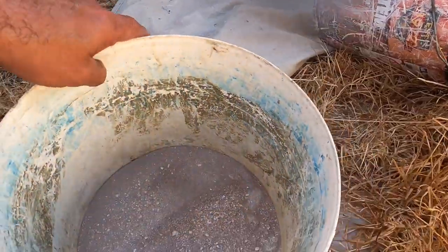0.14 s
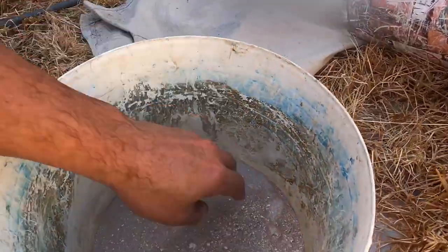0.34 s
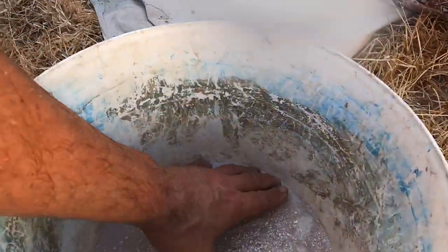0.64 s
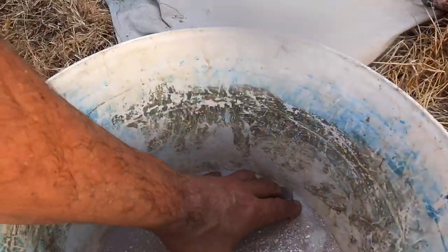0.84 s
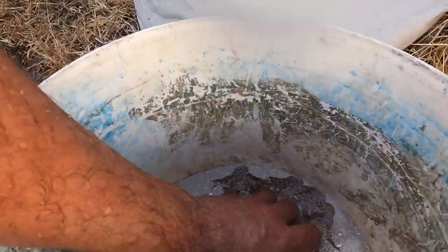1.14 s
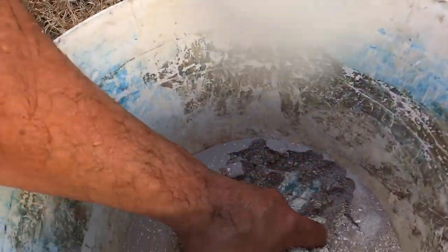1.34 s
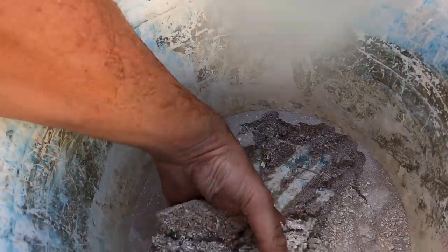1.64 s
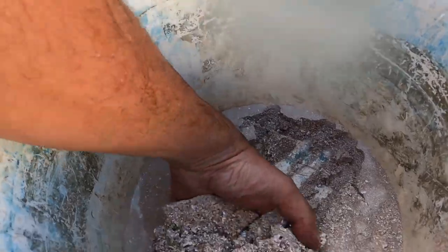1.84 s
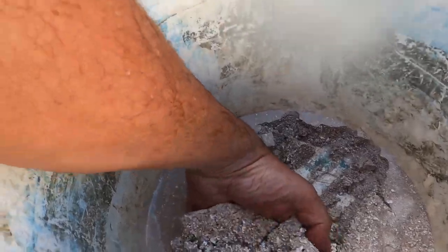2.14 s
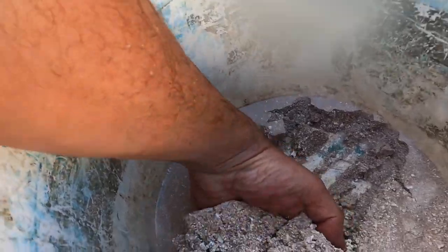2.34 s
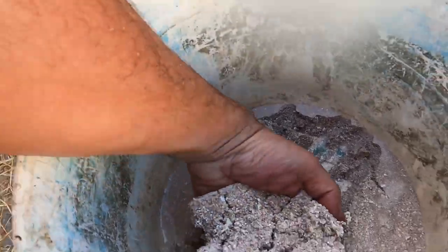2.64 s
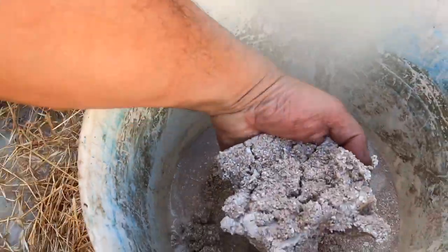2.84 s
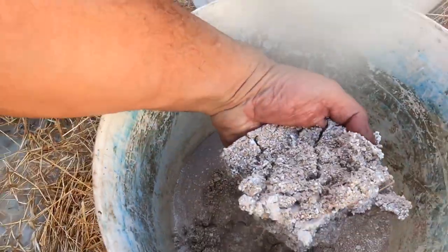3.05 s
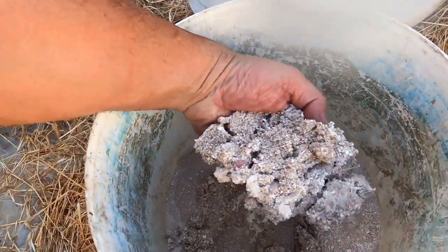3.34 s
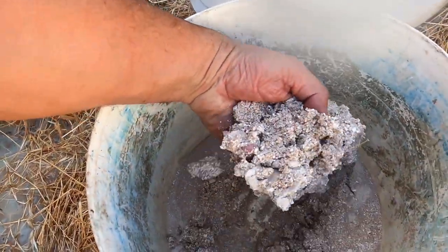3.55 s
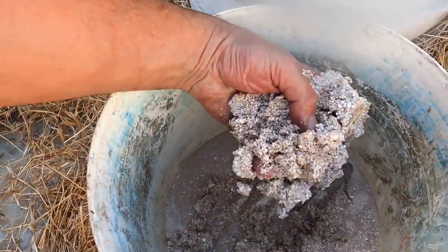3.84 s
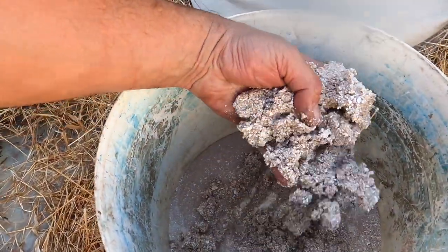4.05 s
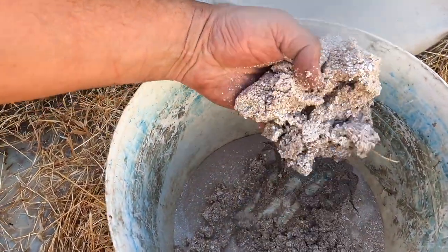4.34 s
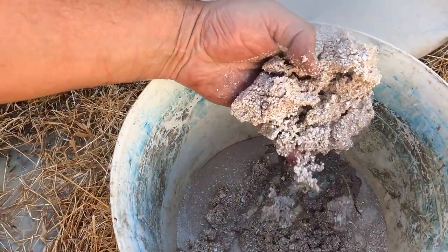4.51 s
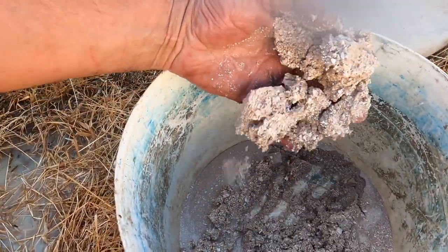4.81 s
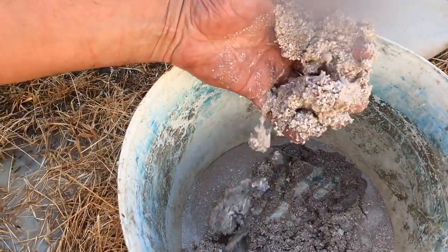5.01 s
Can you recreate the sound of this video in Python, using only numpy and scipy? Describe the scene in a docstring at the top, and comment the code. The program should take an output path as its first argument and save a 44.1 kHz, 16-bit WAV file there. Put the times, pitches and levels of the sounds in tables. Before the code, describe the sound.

Wet gritty scraping and knocking in a plastic bucket, then quiet handling of a crumbling crust with sharp snaps, above a slowing far-off motor hum.

```python
"""A hand digs in the wet sand of a plastic bucket: pressed grit scrapes and drives the bucket's modes.
Lumps knock on the bottom, the palm splats, the released rim rings and short low thuds sink in pitch.
A crumbling crust of scale is prised loose: it rubs, squeals, spills sand and snaps in brittle crumbs.
The impacts are clicks with dying sprays of grit, filtered; faint irregular pops fill three broad bands.
Outdoors, a far engine drones and slows down as a sum of gliding sines over noise of the open air."""
import sys
import numpy as np
from scipy import signal
from scipy.fft import rfft, irfft, next_fast_len
from scipy.io import wavfile

SR = 44100
rng = np.random.default_rng(int(sys.argv[2]) if len(sys.argv) > 2 else 0)


def dump(signal):
    """Clip the signal to [-1, 1] and save it as 16-bit WAV at the path in sys.argv[1]."""
    limited = np.clip(np.atleast_2d(signal).T, -1, 1)
    pcm = np.round(limited * 32767).astype(np.int16)
    wavfile.write(sys.argv[1], SR, pcm)


N = 228199
TIME = np.arange(N) / SR


def digging():
    """Friction: pressed grit excites the bucket's modes; coarse and fine grains also radiate directly."""
    # crushed coarse grit: (frequency [Hz], relative spectral density [dB])
    grit_spectrum = [(400, -13), (1200, -6), (2400, 3.5), (3100, -1), (3600, 4.5), (4600, 2.5),
                     (5600, -1.5), (7500, -6), (10000, -68)]
    # sliding fine sand: (frequency [Hz], relative spectral density [dB])
    sand_spectrum = [(2000, -10), (4000, -4), (5200, 0), (6900, 5), (7600, 2.5), (8400, -13), (10000, -22),
                     (11300, -39), (12500, -33), (14000, -53.5), (16000, -73)]
    pressure, crushed, sliding = efforts()
    channels = []
    for _ in range(2):  # the middle and the sides hear different grains
        bottom_force = grains(1500, spread_db=2.5, clump_db=2.5, clump_rate=160)
        coarse = grains(3500, spread_db=2.0, clump_db=2.5, clump_rate=190)
        fine = grains(12000, spread_db=3.0, clump_db=1.5, clump_rate=67)
        scrape = pressure * rms_one(bucket(bottom_force))
        grit = crushed * rms_one(colour(coarse, grit_spectrum))
        sand = sliding * rms_one(colour(fine, sand_spectrum))
        channels.append(scrape + grit + sand)
    return channels


def efforts():
    """Power addition: steady contact and pushes give amplitudes of pressure, crushing and sliding."""
    # how hard the hand bears on the sand between pushes: (time [s], level [dB])
    contact = [(0, -46.5), (.3, -48), (.62, -50.5), (.78, -43), (.85, -36.5), (.99, -36), (1.015, -45),
               (1.035, -40.5), (1.06, -35), (1.095, -45), (1.15, -37.5), (1.225, -34), (1.27, -36),
               (1.4, -38.5), (1.86, -42), (1.98, -50), (2.9, -45.5), (3.2, -51.5), (3.75, -50.5),
               (5.17, -46.5)]
    # what contact brings: (pressure on the bottom [dB], crushed grit [dB], sliding fine sand [dB])
    contact_shares = (-2.86, 0, 0.49)
    # pushes of the fingers:
    # (time of the height [s], rise [s], fall [s], pressure [dB], crushed grit [dB], sliding sand [dB])
    strokes = [(.675, 0.036, 0.035, -42.5, -41, -61), (0.984, 0.053, 0.017, -31, -27, -29),
               (1.07, 0.016, 0.03, -33, -35, -37), (1.122, .012, 0.012, -41, -47, -33),
               (1.185, 0.052, 0.023, -29, -49, -48), (1.343, 0.059, 0.044, -42, -27, -26),
               (1.48, 0.023, 0.076, -46, -34, -30), (1.53, 0.046, 0.068, -32.5, -34.5, -35),
               (1.73, 0.13, 0.01, -40.5, -49, -39), (2.49, 0.14, 0.064, -37.5, -44, -32.5),
               (2.71, 0.095, 0.04, -47, -53, -42)]
    seep_db = -48.5  # fine sand that never quite settles
    contact_db, = in_time(contact)
    power = np.outer(from_db(contact_shares), from_db(contact_db)) ** 2
    for s, rise_s, fall_s, *levels_db in strokes:
        power += np.outer(from_db(levels_db), swell(s, rise_s, fall_s)) ** 2
    power[2] += from_db(seep_db) ** 2
    return np.sqrt(power)


def bucket(force):
    """Modal superposition: a force on the bottom excites parallel modes of alternating sign."""
    # modes of the loaded bucket: (frequency [Hz], bandwidth [Hz], relative level [dB])
    modes = [(316.5, 18.6, 3), (683, 80, -4), (798, 75, 0), (946, 180, -2), (1172, 160, 0),
             (1358, 104, -1.5), (1467, 78, -1), (1695, 32, 1), (1860, 28, -2), (2560, 360, -21),
             (2950, 34, -3)]
    answer = 0
    for k, (hz, width_hz, db) in enumerate(modes):
        answer = answer + (-1) ** k * from_db(db) * resonance(force, hz, width_hz)
    return soften(answer)


def packing(packing_db=-9):
    """Granular compaction: damp sand gives way under the fingers in many small dull fractures."""
    # dull crunch of packing sand: (frequency [Hz], relative spectral density [dB])
    packing_spectrum = [(120, -26.5), (250, -2.5), (350, 2.5), (450, -9.5), (620, -6.5), (900, -15),
                        (2000, -39), (16000, -80)]
    pressure = efforts()[0]
    fractures = grains(900, spread_db=3.5, clump_db=3.5, clump_rate=50)
    return from_db(packing_db) * pressure * rms_one(colour(fractures, packing_spectrum))


def slap():
    """Impact on a lossy surface: the palm lands flat on the wet sand in a quick run of splats."""
    # landings of the palm: (time [s], peak level [dB])
    slaps = [(.5465, -18), (.5515, -8.5), (.557, -19)]
    # splat of a landing: (frequency [Hz], relative spectral density [dB])
    splat_spectrum = [(400, -35), (800, -7), (1300, 5), (1900, 6), (2400, -7), (3300, -6), (4500, -15),
                      (7000, -30), (9000, -53), (16000, -75)]
    return blows(slaps, lambda x: colour(x, splat_spectrum), crumble=0.17, crumble_s=0.0051)


def squeal(width_hz=550, wander_hz=240):
    """Stick-slip: a hard edge's fast uneven slips modulate a screech that drops in pitch and settles."""
    # squeals over grit: (time of the height [s], rise [s], fall [s], level [dB], settled pitch [Hz])
    squeals = [(1.353, 0.049, 0.032, -23, 3440), (1.482, 0.029, 0.034, -30, 5500)]
    sharp_share, settle_s = .05, .017  # excess pitch at the height; it decays as the stroke slows
    out = 0
    for s, rise_s, fall_s, db, settled_hz in squeals:
        sharp = np.minimum(sharp_share * np.exp(np.minimum((s - TIME) / settle_s, 10)), .5)
        roughness = drift(2 * width_hz)
        hz = settled_hz * (1 + sharp) + wander_hz * drift(150)
        out = out + from_db(db) * swell(s, rise_s, fall_s) * roughness * tone(hz)
    return out


def rub():
    """Amplitude modulation: slips of damp grains along the wall form a noise band with gliding centre."""
    # rubs of the crust as it is prised loose: (time of the height [s], rise [s], fall [s],
    # level [dB], centre at the height [Hz], glide [octaves/s])
    rubs = [(2.47, 0.13, 0.076, -39.5, 1243, -1), (2.508, 0.012, 0.038, -36, 1384, 2),
            (2.685, 0.1, 0.021, -44, 1320, 3), (2.765, 0.02, 0.023, -38.5, 1254, -2.5)]
    band_hz = 390
    out = 0
    for s, rise_s, fall_s, db, hz, glide in rubs:
        slips = grains(2400, spread_db=2.5, clump_db=-0.5, clump_rate=79)
        slips = rms_one(soften(slips, band_hz / 2 * np.sqrt(2)))
        octaves = np.clip(glide * (TIME - s), -1, 1)
        out = out + from_db(db) * swell(s, rise_s, fall_s) * slips * tone(hz * 2 ** octaves)
    return out


def knocks(clack_db=-2.5, ring_db=-8, crack_db=4):
    """Impact excitation: a lump clacks on the damped bottom, rings it faintly and cracks at its surface."""
    # lumps and fingers on the plastic, before the layer gains:
    # (time [s], peak level of the knock [dB], peak level of its gritty crack [dB])
    knock_rows = [(.002, -16.5, -42), (.035, -25, -37), (.089, -18, -20.5), (0.101, -14.5, -22),
                  (0.124, -21, -39), (.268, -25, -26), (0.541, -15.5, -18), (0.545, -12.5, -16),
                  (0.549, -28, -22), (.551, -17.5, -27), (.66, -24.5, -44), (.991, -10.5, -30),
                  (0.998, -13, -38), (1.011, -12.5, -34), (1.0402, -9.5, -21.5), (1.049, -17, -16),
                  (1.068, -17, -35), (1.08, -12, -33), (1.1027, -9.5, -23), (1.111, -14, -12.5),
                  (1.116, -14, -18), (1.1227, -13.5, -11.5), (1.136, -17, -19), (1.1644, -15.5, -12.5),
                  (1.172, -16.5, -14), (1.1803, -17, -10.5), (1.185, -17, -12.5), (1.1905, -23, -11),
                  (1.2134, -16, -21.5), (2.496, -32, -26), (2.511, -22, -38), (2.642, -24.5, -32),
                  (2.687, -26.5, -32), (2.728, -32, -25.5), (2.737, -23.5, -42), (3.477, -26.5, -48),
                  (4.927, -26, -46)]
    # dead clack on the sand-damped bottom: (frequency [Hz], relative spectral density [dB])
    clack_spectrum = [(300, -15), (650, -22.5), (950, 2.5), (1250, 2.5), (1750, -4), (2400, -6.5),
                      (4000, -23.5), (8000, -31), (16000, -66)]
    # gritty crack: (frequency [Hz], relative spectral density [dB])
    crack_spectrum = [(500, -13), (1800, 0.5), (3500, 9.5), (5700, 4), (7400, 3.5), (8500, -18),
                      (11000, -33), (16000, -47)]
    s, peak_db, grit_db = np.transpose(knock_rows)
    clack = blows(np.c_[s, peak_db + clack_db], lambda x: colour(x, clack_spectrum),
                  crumble=0.16, crumble_s=0.0028)
    ringing = blows(np.c_[s, peak_db + ring_db], bucket, crumble=0.083, crumble_s=0.0077)
    crack = blows(np.c_[s, grit_db + crack_db], lambda x: colour(x, crack_spectrum),
                  crumble=0.17, crumble_s=0.002)
    return clack + ringing + crack


def thuds():
    """Damped free vibration: short thuds sink in pitch as they die; the free rim rings longer."""
    # short low sinking thuds: (time [s], initial level [dB], pitch [Hz])
    thud_rows = [(.205, -33, 283), (.553, -24, 822), (0.665, -28, 377), (0.684, -27.5, 337),
                 (1.076, -25.5, 346), (1.169, -23, 330), (1.195, -18, 328), (1.201, -21.5, 236),
                 (1.74, -32.5, 326), (1.885, -31.5, 341)]
    # the rim springs free of the hand: (time [s], initial level [dB])
    rim_taps = [(.001, -25.5), (0.099, -28.5)]
    # modes of the free rim: (frequency [Hz], relative level [dB], 60 dB decay time [s])
    rim_modes = [(314, 1, 0.18), (838, -3.5, 0.18)]
    t60_s, sag_per_s = .085, 3.1  # 60 dB decay time; share of its pitch a thud loses per second
    low = sum(ring(s, db, hz, t60_s, sag_per_s) for s, db, hz in thud_rows)
    rim = sum(ring(s, db + mode_db, hz, t60) for s, db in rim_taps for hz, mode_db, t60 in rim_modes)
    return low + rim


def crumbs():
    """Brittle fracture gives bright snaps of the crust; wet contacts give duller ticks."""
    # crumbs snapping: (time [s], peak level [dB])
    snap_rows = [(1.452, -16.5), (2.8814, -24.5), (3.757, -31.5), (3.8563, -16), (3.9037, -9), (3.9085, -8),
                 (3.9105, -26), (3.931, -22), (4.0362, -18.5), (4.0711, -23), (4.4848, -14),
                 (4.6577, -21.5), (4.804, -23.5), (5.0, -23), (5.1519, -15), (5.157, -17), (5.162, -19.5),
                 (5.168, -17.5)]
    # clearest wet ticks: (time [s], peak level [dB])
    tick_rows = [(.05, -29), (.208, -24.5), (.313, -21.5), (.373, -26.5), (.41, -24), (.43, -23),
                 (.468, -24.5), (.507, -27), (.618, -27), (2.975, -26), (3.2, -26), (3.284, -25.5),
                 (3.477, -30), (3.496, -25), (4.629, -26.5), (4.881, -31), (5.061, -28)]
    # snap of the crust: (frequency [Hz], relative spectral density [dB])
    snap_spectrum = [(800, -33), (2600, -11.5), (3900, -1.5), (5500, 3.5), (7200, 10), (8000, -2),
                     (9000, -26), (12000, -46), (16000, -70)]
    # wet tick: (frequency [Hz], relative spectral density [dB])
    tick_spectrum = [(400, -11), (750, -26), (1050, -5), (1400, -8), (1850, 3.5), (2400, 1.5), (3300, -10),
                     (5000, -4.5), (7000, -4), (9000, -48), (16000, -81)]
    snaps = blows(snap_rows, lambda x: colour(x, snap_spectrum), crumble=0.18, crumble_s=0.003)
    ticks = blows(tick_rows + faint_ticks(), lambda x: colour(x, tick_spectrum),
                  crumble=0.66, crumble_s=0.0027)
    return snaps + ticks


def faint_ticks(jitter=0.36, spread_db=2):
    """Jittered point process: unevenly spaced contacts as rows (time [s], peak level [dB])."""
    # loose runs of fainter ticks: (start [s], end [s], rate [1/s], mean peak level [dB])
    tick_runs = [(0.326, 0.453, 49, -29.5), (4.537, 5.1, 12, -34)]
    rows = []
    for start, end, per_s, db in tick_runs:
        for s in np.arange(start, end, 1 / per_s):
            late, louder = rng.standard_normal(2)
            rows.append((s + jitter * late / per_s, db + spread_db * louder))
    return rows


def spill():
    """Granular flow: loose grains fall off the crust as it is prised up and crumbles."""
    # spills: (time of the height [s], rise [s], fall [s], level [dB])
    spills = [(2.298, 0.18, 0.15, -46), (2.89, 0.041, 0.04, -44), (3.27, 0.058, 0.036, -39.5),
              (3.59, 0.03, 0.053, -39.5), (3.76, 0.12, .07, -49), (4.1, 0.28, 0.34, -36),
              (4.135, 0.0098, 0.017, -37), (4.29, 0.031, 0.03, -38), (5.1, 0.18, 0.15, -42)]
    # loose dry sand falling: (frequency [Hz], relative spectral density [dB])
    spill_spectrum = [(1500, -2.5), (4000, -7), (5200, -1.5), (6800, 5), (7600, 1), (8400, -10),
                      (10000, -19), (11300, -28.5), (12500, -27), (14000, -41), (16000, -43)]
    power = sum((from_db(db) * swell(s, rise_s, fall_s)) ** 2 for s, rise_s, fall_s, db in spills)
    falling = grains(9000, spread_db=2.0, clump_db=4.0, clump_rate=70)
    return np.sqrt(power) * rms_one(colour(falling, spill_spectrum))


def faint_pops():
    """Filtered shot noise: random impulses through three resonances give faint irregular pops."""
    # level of the pops: (time [s], level [dB])
    pop_curve = [(0, -46), (.4, -58), (.7, -50), (1.2, -43), (2.1, -52), (2.9, -48), (3.2, -47), (3.6, -51),
                 (4.1, -49), (4.7, -55), (5.17, -48)]
    # three broad bands near 1, 1.8 and 2.6 kHz: (frequency [Hz], bandwidth [Hz], relative level [dB])
    pop_bands = [(960, 150, -2), (1847, 400, -2), (2600, 600, -3.5)]
    db, = in_time(pop_curve)
    pops = 0
    for hz, width_hz, level_db in pop_bands:
        impulses = grains(650, spread_db=2.0, clump_db=5.5, clump_rate=88)
        pops = pops + from_db(level_db) * resonance(impulses, hz, width_hz)
    return from_db(db) * rms_one(soften(pops))


def walls(x, ring_s=0.01):
    """Early reflections: dense decaying echoes inside the bucket, of unit total energy."""
    age = TIME[:SR // 20]
    echoes = rng.standard_normal(len(age)) * np.exp(-age / ring_s) * (age > .0007)
    return signal.fftconvolve(x, echoes / np.linalg.norm(echoes))[:N]


def engine(waver_db=2.0, waver_rate=8, drone_db=-2):
    """Harmonic series through resonances: the five lowest exhaust orders carry; each wavers on its own."""
    # the far engine slows in two steps: (time [s], shaft frequency [Hz])
    engine_speed = [(0, 39.85), (.56, 38.9), (.8, 37.25), (1.3, 37.33), (1.9, 35.8), (2.3, 35.1),
                    (2.8, 34.4), (3.27, 35.93), (3.5, 29.42), (3.73, 27.4), (4.05, 29.22), (4.3, 28.82),
                    (4.55, 24.34), (4.75, 22.9), (5.17, 23.1)]
    # overall level of the hum: (time [s], relative level [dB])
    engine_load = [(0, -5.5), (.95, -3.5), (1.5, -2.5), (2.1, 0.5), (3.6, -5), (4.6, -1.5), (5.17, -1)]
    # strength of shaft orders 1 to 5: one relative level [dB] each
    orders_db = (8.5, 0.5, 0.5, -3.5, 4)
    # exhaust resonances that the orders slide through: (frequency [Hz], level [dB])
    exhaust = [(25, -50), (37, -45.5), (48, -34.5), (58, -31.5), (71, -36.5), (84, -30), (94, -36.5),
               (106, -35), (116, -33.5), (124, -37.5), (143, -43.5), (180, -48.5), (200, -55)]
    # booms around one pitch: (time of the height [s], rise [s], fall [s], added level [dB])
    booms = [(1.3, 0.1, 0.11, 5.5), (1.85, 0.12, 0.26, 7.5), (2.34, 0.13, 0.62, 16), (3.17, 0.21, 0.14, 12),
             (3.475, 0.072, 0.05, 23), (4.455, 0.047, 0.046, 13.5), (4.681, 0.18, 0.086, 12)]
    # second drone, before its gain: (time [s], frequency [Hz], level [dB])
    drone = [(0, 137.7, -35), (.7, 136.5, -40.5), (1, 132.9, -29), (1.6, 135.6, -43), (3.1, 133.9, -34.5),
             (3.4, 129, -40), (3.65, 128, -31.5), (4.1, 123, -67)]
    boom_hz, boom_width_hz = 73.2, 15
    shaft_hz, = in_time(engine_speed)
    load_db, = in_time(engine_load)
    boom_db = sum(db * swell(s, rise_s, fall_s) for s, rise_s, fall_s, db in booms)
    hum = 0
    for order, order_db in enumerate(orders_db, 1):
        hz = order * shaft_hz
        boom_share = np.exp(-((hz - boom_hz) / boom_width_hz) ** 2)
        db = order_db + at_hz(exhaust, hz) + load_db + boom_db * boom_share
        hum = hum + from_db(db + waver_db * drift(waver_rate)) * tone(hz)
    hz, db = in_time(drone)
    return hum + from_db(db + drone_db) * tone(hz)


def open_air(air_db=-35):
    """Stationary noise: two independent channels of coloured noise form the outdoor background."""
    # open air: (frequency [Hz], relative spectral density [dB])
    air_spectrum = [(15, -2), (30, -3), (60, 1), (110, -3), (170, -6), (260, -17), (400, -25.5),
                    (600, -28.5), (1000, -28), (1500, -37), (2500, -35.5), (4000, -49), (7500, -40),
                    (10000, -51), (16000, -70)]
    return from_db(air_db) * rms_one(colour(rng.standard_normal((2, N)), air_spectrum))


def grains(per_s, spread_db, clump_db, clump_rate):
    """Shot noise: random impulses of uneven size and either sign, bunched by a random drift."""
    born = rng.random(N) < per_s / SR
    sizes_db = spread_db * np.minimum(rng.exponential(1, N), 4)
    signs = rng.choice([-1, 1], N)
    return born * from_db(sizes_db) * signs * from_db(clump_db * drift(clump_rate))


def blows(rows, body, crumble, crumble_s):
    """Impulse response: a click and dying spray of grit pass through a body at each row's peak level."""
    age = TIME[:SR // 20]
    sprays = rng.standard_normal((len(rows), len(age))) * np.exp(-age / crumble_s) * crumble
    sprays[:, 0] = 1  # the click
    answer = body(signal.unit_impulse(N))[:SR // 10]
    out = np.zeros(N + SR)
    for (s, db), spray in zip(rows, sprays):
        hit = signal.fftconvolve(spray, answer)
        start = max(round(s * SR), 0)
        out[start:start + len(hit)] += from_db(db) * hit / np.abs(hit).max()
    return out[:N]


def ring(s, db, hz, t60, sag_per_s=0):
    """Exponential decay: one struck mode dies away, its pitch perhaps sinking."""
    age = np.clip(TIME - s, 0, 3 * t60)
    cycles = hz * age * (1 - sag_per_s * age / 2)
    return from_db(db - 60 * age / t60) * np.sin(2 * np.pi * cycles)


def tone(hz):
    """Phase accumulation: a gliding sine of unit power."""
    return np.sqrt(2) * np.sin(2 * np.pi * (np.cumsum(hz) / SR + rng.random()))


def resonance(x, hz, width_hz):
    """Damped oscillator: a two-pole resonance with gain of about 1 on top."""
    r = np.exp(-np.pi * width_hz / SR)
    zeros = np.array([1, 0, -1]) * (1 - r * r) / 2
    poles = [1, -2 * r * np.cos(2 * np.pi * hz / SR), r * r]
    return signal.lfilter(zeros, poles, x + 1e-18)


def soften(x, top_hz=6000):
    """Low-pass filtering: rounds off the sharp edges of contacts."""
    return signal.sosfilt(signal.butter(4, top_hz, fs=SR, output="sos"), x)


def colour(x, spectrum):
    """Minimum phase: a causal filter follows a spectrum by folding its cepstrum."""
    size = next_fast_len(N + SR // 2, real=True) // 2 * 2
    gain = from_db(at_hz(spectrum, np.fft.rfftfreq(size, 1 / SR)))
    cepstrum = irfft(np.log(gain))
    cepstrum[1:size // 2] *= 2
    cepstrum[size // 2 + 1:] = 0
    return irfft(rfft(x, size) * np.exp(rfft(cepstrum)))[..., :N]


def at_hz(spectrum, hz):
    """Logarithmic frequency scale: a spectrum's level in dB at any frequency."""
    points_hz, db = np.transpose(spectrum)
    return np.interp(np.log(np.maximum(hz, 1)), np.log(points_hz), db)


def swell(s, rise_s, fall_s):
    """Gaussian envelope: a smooth hump of height 1 with separate rise and fall."""
    distance = (TIME - s) / np.where(TIME < s, rise_s, fall_s)
    return np.exp(-np.minimum(distance ** 2, 40))


def drift(rate):
    """Random modulation: interpolated noise with unit power and `rate` knots per second."""
    knots = rng.standard_normal(4096)
    return rms_one(np.interp(TIME * rate, np.arange(len(knots)), knots))


def in_time(rows):
    """Linear interpolation: each column of a curve at every sample."""
    s, *columns = np.transpose(rows)
    return [np.interp(TIME, s, c) for c in columns]


def from_db(db):
    """Logarithmic level: decibels to amplitude gain."""
    return 10 ** (np.asarray(db) / 20)


def rms_one(x):
    """Power normalisation: scale to unit mean square."""
    return x / np.sqrt(np.mean(x ** 2) + 1e-20)


def lean(x, sign):
    """Interaural level difference: one ear's share of each frequency, with no delay between ears."""
    # stereo balance: (frequency [Hz], left minus right [dB])
    balance = [(200, 0), (500, 0), (1000, -1.6), (2000, -1.9), (3800, -1.7), (5500, -.9), (7500, .4),
               (10000, 6), (13000, 10.5)]
    share_db = sign * at_hz(balance, np.fft.rfftfreq(2 * N, 1 / SR)) / 2
    return irfft(rfft(x, 2 * N) * from_db(share_db))[:N]


def scene(wall_db=-15, grain_wall_db=-10, side_wall_db=-3):
    """Superposition: close sounds over engine and air; reflections colour and widen them."""
    # stereo width filter for the side signal: (frequency [Hz], gain [dB])
    width = [(25, -29), (60, -16.5), (130, -44), (260, -16), (600, -9.5), (2000, -8), (4500, -8.5),
             (7000, -19.5), (12000, 4.5)]
    hits = slap() + squeal() + rub() + knocks() + thuds() + crumbs()
    dig, dig_side = digging()
    air, air_side = open_air()
    reflections = walls(from_db(wall_db) * hits + from_db(grain_wall_db) * dig)
    near = dig + packing() + hits + spill() + faint_pops() + reflections
    mid = near + air + engine()
    side_reflections = from_db(side_wall_db) * walls(hits)
    side = colour(dig_side + side_reflections + spill() + faint_pops() + air_side, width)
    return np.array([lean(mid + sign * side, sign) for sign in (1, -1)])  # left, right


def record(dry):
    """Band limitation: an elliptic low-pass cuts the top steeply."""
    cutoff_hz = 15800
    return signal.sosfilt(signal.ellip(10, .1, 80, cutoff_hz, fs=SR, output="sos"), dry)


dry = scene()
out = record(dry)
dump(out)
```